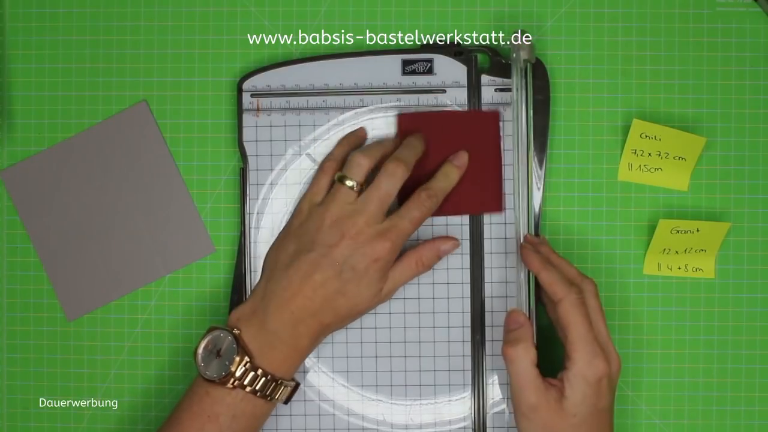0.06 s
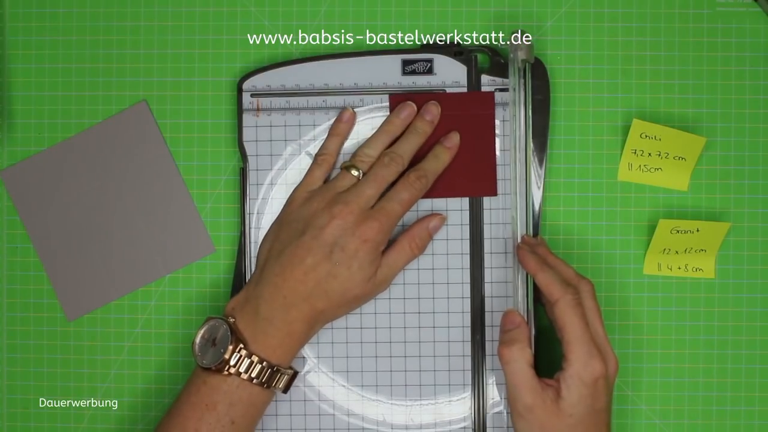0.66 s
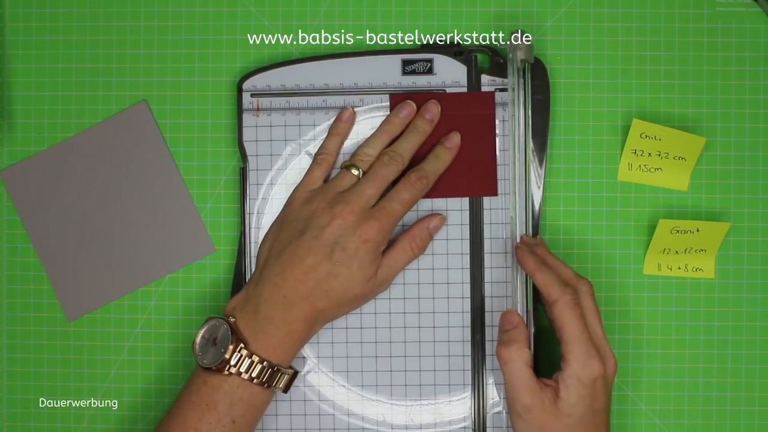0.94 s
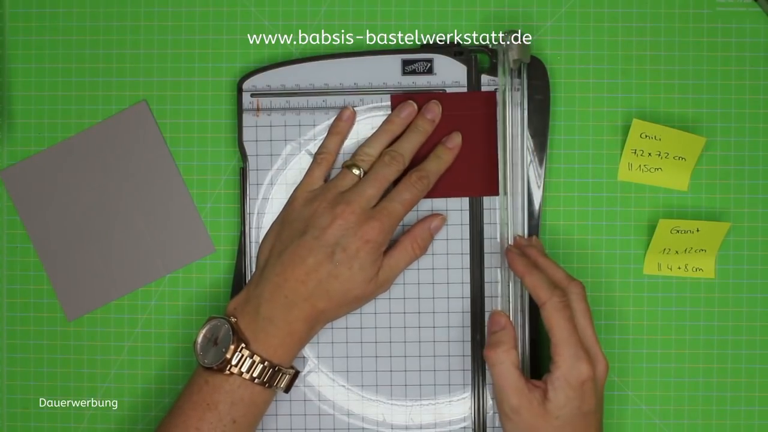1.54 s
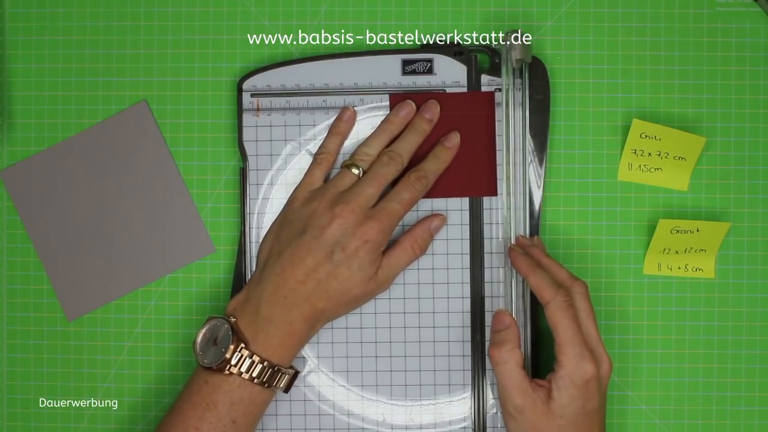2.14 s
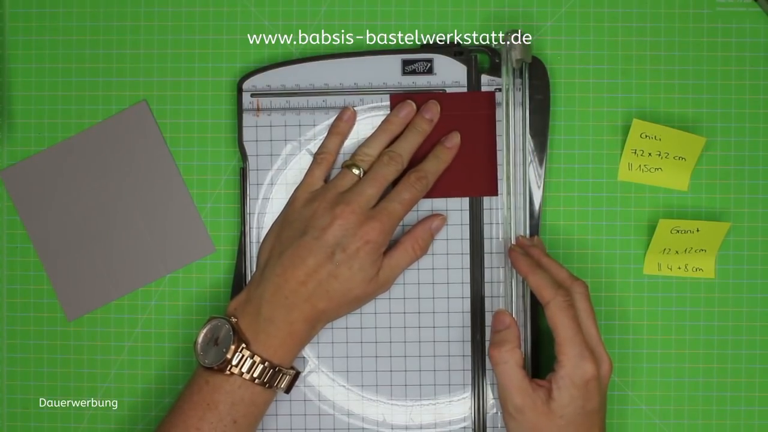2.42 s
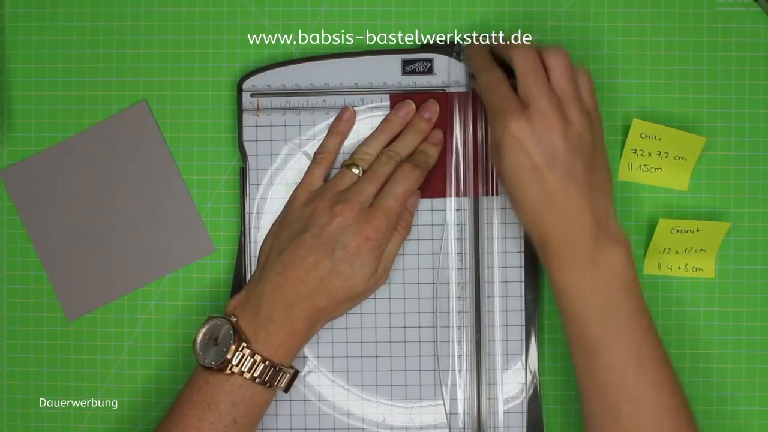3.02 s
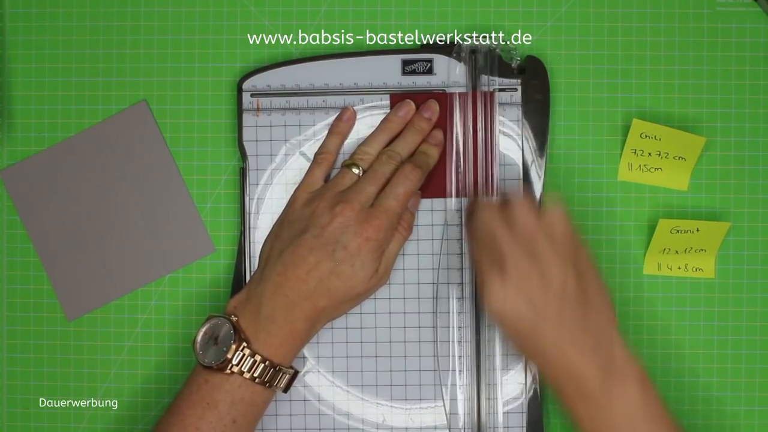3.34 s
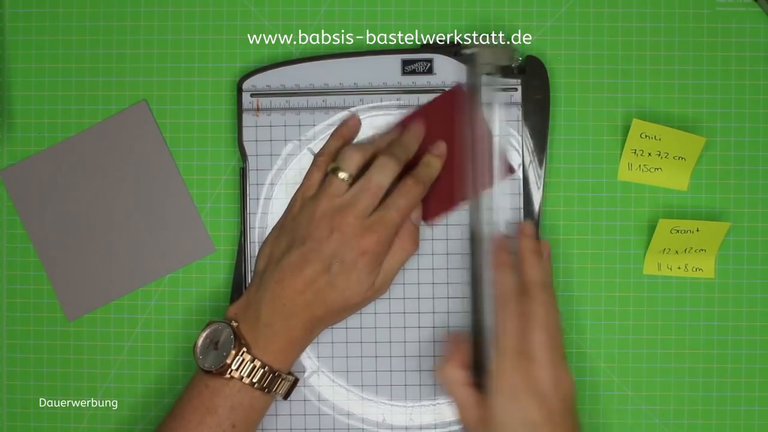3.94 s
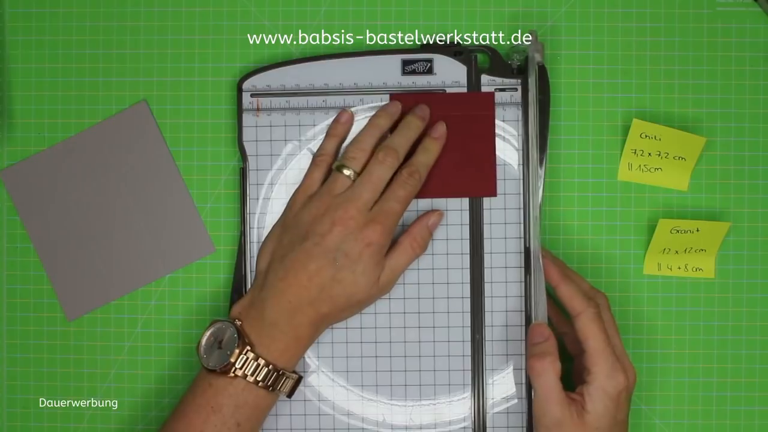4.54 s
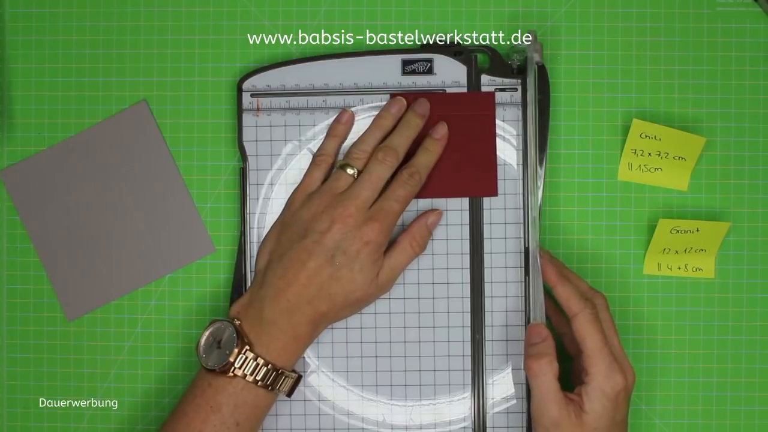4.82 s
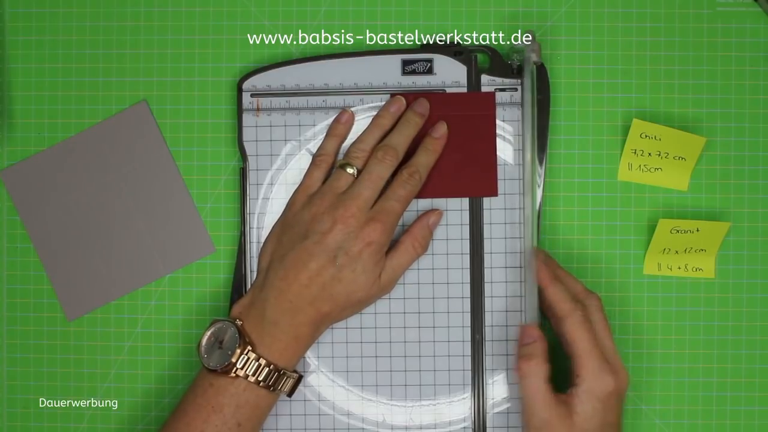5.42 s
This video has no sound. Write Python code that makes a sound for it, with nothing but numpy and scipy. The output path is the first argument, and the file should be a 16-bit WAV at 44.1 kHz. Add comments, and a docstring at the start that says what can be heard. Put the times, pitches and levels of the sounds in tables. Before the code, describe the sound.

A paper trimmer is handled nearby in a small, quiet room with a faint steady hum and hiss. In the first half second, card rubs softly over the trimmer bed with a few light finger taps. Faint ticks follow around 1.3 to 1.9 seconds. At 2.7 seconds the plastic rail snaps down with a short ring. From 3 seconds the slider clicks loosely, then scrapes along the rail and back until about 3.8 seconds, chattering, rasping and briefly groaning while the scoring blade hisses over the card. This is loudest around 3.5 seconds. The rail lifts with small clicks near 3.9 seconds, and the card is turned and lined up with dull rubs and soft taps until about 4.6 seconds. After a quiet pause, a few light clicks lead to the rail snapping down again at 5.6 seconds.

```python
"""A paper trimmer on a craft table in a small, quiet room with a faint mains hum.
Fingers tap and nudge a card into place, rubbing it over the bed. At 2.7 s the clear rail snaps down
and its plastic modes ring. From 3 s the slider clicks in its play and runs up the rail and back:
stick-slip makes it chatter, rasp and groan while the scoring blade hisses over the card's fibres.
At 3.9 s the rail is lifted, the card is turned and lined up, and at 5.6 s the rail snaps down again."""
import sys
import numpy as np
from scipy import signal
from scipy.fft import rfft, irfft
from scipy.io import wavfile

SR = 44100
rng = np.random.default_rng(int(sys.argv[2]) if len(sys.argv) > 2 else 0)


def wrap_up_sound(samples):
    """Save the sound to the file named by the first command line argument, as 16-bit audio."""
    columns = np.atleast_2d(samples).T
    # keep every value between -1 and 1, then stretch to whole-number steps
    tamed = np.clip(columns, -1, 1)
    steps = np.round(tamed * 32767).astype(np.int16)
    wavfile.write(sys.argv[1], SR, steps)


N = 250047
TIME = np.arange(N) / SR
RING_TIME = TIME[:SR // 3]


def amp(db):
    """Decibels to gain."""
    return 10 ** (np.asarray(db) / 20)


def unit(x):
    """Scale to rms 1."""
    return x / np.sqrt(np.mean(x ** 2) + 1e-20)


def lookup(points, hz):
    """Interpolate on a log-frequency axis."""
    f, value = np.transpose(points)
    return np.interp(np.log(hz + 1), np.log(f + 1), value)


def colour(x, spectrum):
    """Zero-phase filter from (f/Hz, gain/dB) points."""
    hz = np.fft.rfftfreq(len(x), 1 / SR)
    return irfft(rfft(x) * amp(lookup(spectrum, hz)), len(x))


def causal_pulse(spectrum):
    """Minimum-phase pulse from (f/Hz, gain/dB) points."""
    hz = abs(np.fft.fftfreq(2048, 1 / SR))
    log_gain = np.log(amp(lookup(spectrum, hz)))
    return np.fft.ifft(np.exp(np.conj(signal.hilbert(log_gain)))).real[:1024]


def band(x, lo_hz, hi_hz):
    """Causal band-pass."""
    return signal.sosfilt(signal.butter(3, [lo_hz, hi_hz], "band", fs=SR, output="sos"), x)


def lowpass(x, hz, order=2):
    """Causal low-pass."""
    return signal.sosfilt(signal.butter(order, hz, fs=SR, output="sos"), x)


def add(mix, start_s, sound):
    """Mix in place from start_s."""
    part = mix[round(start_s * SR):][:len(sound)]
    part += sound[:len(part)]


def swell(t, length_s, rise_share=0.49, ends_db=-37):
    """Bell-shaped gain, peak at t = 0."""
    away = t / (length_s * np.where(t < 0, rise_share, 1 - rise_share))
    return amp(ends_db * np.minimum(away ** 2, 10))


def ring(modes):
    """One decaying sine per mode, alternating in sign."""
    hz, db, t60_s = np.transpose(modes)[:, :, None]
    sign = (-1) ** np.arange(len(modes))[:, None]
    return sign * amp(db - 60 * RING_TIME / t60_s) * np.sin(2 * np.pi * hz * RING_TIME)


def friction(slips_per_s, spread_db, smooth, clump_db, clump_hz):
    """Tiny uneven slips over a smooth rub, clumping as the surface varies."""
    sizes = rng.standard_normal(N) * amp(spread_db * np.minimum(rng.exponential(1, N), 4))
    slips = sizes * (rng.random(N) < slips_per_s / SR)
    clumps = unit(lowpass(rng.standard_normal(N), clump_hz))
    rub = smooth * rng.standard_normal(N)
    return unit((unit(slips) + rub) * amp(clump_db * clumps))


# still-room spectrum: f/Hz, gain/dB
ROOM_SPECTRUM = [(12, -16), (20, -1.5), (49, -9.5), (61, -7.5), (77, -19.5), (138, -15.5), (216, -19.5),
                 (285, -18.5), (357, -21.5), (527, -24.5), (607, -25), (698, -28), (1530, -30),
                 (11400, -31.5), (16000, -35)]


def background(air_db=-62, hum_db=-64, mains_hz=50):
    """Steady hiss and rumble with a wavering mains hum."""
    waver = unit(colour(rng.standard_normal(N), [(1, 16), (4, -4), (12, -36), (40, -100)]))
    hum = np.sqrt(2) * (1 + 0.34 * waver) * np.sin(2 * np.pi * mains_hz * TIME)
    air = colour(rng.standard_normal(N), ROOM_SPECTRUM)
    air /= np.std(band(air, 85, 18000))
    return amp(air_db) * air + amp(hum_db) * hum


# room decay: f/Hz, t60/s
ROOM_T60 = [(100, 1), (400, 0.56), (2000, 0.33), (6000, 0.27), (15000, 0.49)]
# desk, shelf and wall reflections: delay/s, level/dB
REFLECTIONS = [(.0068, -26), (0.009, -28.5), (0.025, -28), (.029, -26.5), (.058, -19)]


def room(x, tail_db, build_s):
    """Direct sound, early reflections and a diffuse tail; the bass lasts longest."""
    hz, t, bins = signal.stft(rng.standard_normal(SR // 2), SR, nperseg=256)
    decay = 1e-3 ** (t / lookup(ROOM_T60, hz)[:, None])
    response = signal.istft(bins * decay, SR, nperseg=256)[1]
    response *= np.minimum(TIME[:len(response)] / build_s, 1) ** 2
    response *= amp(tail_db) / np.linalg.norm(response)
    for delay_s, db in REFLECTIONS:
        add(response, delay_s, amp([db]))
    absorbed = lowpass(response, 7000, order=1)
    return x + signal.oaconvolve(x, absorbed)[:N]


# modes of the trimmer bed and table: f/Hz, level/dB, t60/s
BED_MODES = [(127.3, 2, 0.053), (130.8, -14.5, 0.41), (293, -7, 0.092), (408, -8.5, 0.094),
             (516, 1.5, 0.024), (569.4, 2, 0.076), (690, 0, 0.05), (779.5, 2, 0.06), (1070, -58, 0.04),
             (1115, -3.5, 0.095), (1200, -19, 0.045), (1520, 5.5, 0.035), (1860, 5.5, 0.039),
             (2000, 4, 0.042), (2590, -7, 0.033), (2497, -6.5, 0.057), (2760, -4, 0.062), (6140, -32, .015)]


def through_bed(x, ring_db):
    """Friction heard directly and through the bed's modes."""
    ringing = signal.oaconvolve(x, ring(BED_MODES).sum(0))[:N]
    return unit(x + amp(ring_db) * unit(ringing))


# sliding-card spectra: f/Hz, gain/dB
CARD_RUB_SPECTRUM = [(80, 1), (150, 4.5), (300, -8.5), (500, 10), (800, 2), (1300, -5.5), (2600, -8.5),
                     (4000, -19.5), (7000, -27)]
CARD_HISS_SPECTRUM = [(1500, 7.5), (3000, 1), (5000, -0.5), (6800, 8.5), (9000, 0), (13000, 8), (16000, -7)]
# card shoves: peak t/s, length/s, rub level/dB, hiss level/dB
CARD_SHOVES = [(0.01, 0.06, -54.5, -70), (0.064, 0.29, -59.5, -64), (0.175, 0.056, -45.5, -69),
               (0.215, 0.34, -70, -60), (1.415, 0.13, -63.5, -84), (2.612, 0.061, -58, -46.5),
               (3.938, 0.29, -59, -54.5), (3.999, 0.08, -40.5, -56), (4.043, 0.079, -40.5, -62),
               (4.058, 0.035, -57, -46.5), (4.091, 0.044, -44, -66), (4.139, 0.18, -59, -67),
               (4.242, 0.19, -67, -60), (4.304, 0.062, -44.5, -65), (4.39, 0.18, -81, -60)]


def card():
    """Card dragged by fingertips: dull rub in the bed, fine hiss of fibres."""
    slips = friction(slips_per_s=1800, spread_db=2, smooth=1, clump_db=0.5, clump_hz=90)
    rub = unit(colour(through_bed(slips, ring_db=-16.5), CARD_RUB_SPECTRUM))
    hiss = unit(colour(slips, CARD_HISS_SPECTRUM))
    return sum(swell(TIME - peak_s, length_s) * (amp(rub_db) * rub + amp(hiss_db) * hiss)
               for peak_s, length_s, rub_db, hiss_db in CARD_SHOVES)


def groan(t, hz, width_hz):
    """Rough friction driving one narrow resonance."""
    flutter = lowpass(rng.standard_normal((2, len(t))), width_hz / 2)
    swing = flutter[0] + 1j * flutter[1]
    swing /= np.sqrt(abs(swing) + 1e-9)  # grip limits the swing
    return unit((swing * np.exp(2j * np.pi * hz * t)).real)


# stick-slip groans and squeaks: peak t/s, length/s, f/Hz, level/dB
STICK_SLIPS = [(0.181, 0.047, 801.5, -48.5), (3.313, 0.064, 700, -33.5), (3.347, 0.067, 399, -38.5),
               (3.459, 0.028, 408, -24), (3.521, 0.047, 396, -27.5), (3.557, 0.074, 650, -30.5),
               (3.621, 0.057, 413, -30), (3.919, 0.014, 2746, -32.5), (3.994, .08, 425, -39.5),
               (4.047, 0.062, 785, -40)]


def groans():
    """Slider, rail or card catches; one resonance swells and dies."""
    out, t = np.zeros(N + SR), TIME[:SR // 4]
    middle_s = t[-1] / 2
    for peak_s, length_s, hz, db in STICK_SLIPS:
        gain = amp(db) * swell(t - middle_s, length_s)
        add(out, peak_s - middle_s, gain * groan(t, hz, width_hz=84))
    return out[:N]


# edges of the four blow bands (table thud, bed knock, plastic clack, edge tick): f/Hz
BLOW_EDGES_HZ = [85, 250, 1200, 4000, 18000]
# share of hardness per band: thud, knock, clack, tick
BAND_HARDNESS = [0, 0, .5, 1]


def blows(rows, modes, spectrum, balance_db, spot_db, click_db, crack_db, crack_t60_s,
          buzz_db, buzz_t60_s, favour_db, favour_octaves):
    """Click, crack, dense plastic buzz and clear modes; hard contact lifts the treble."""
    out, t = np.zeros(N), RING_TIME
    tones, mode_hz = ring(modes), np.transpose(modes)[0]
    pulse = causal_pulse(spectrum)
    fade = amp(crack_db - 60 * t / crack_t60_s) + amp(buzz_db - 60 * t / buzz_t60_s)
    attack = round(0.012 * SR)
    centre_hz = np.sqrt(np.multiply(BLOW_EDGES_HZ[:-1], BLOW_EDGES_HZ[1:]))
    for start_s, spot_hz, level_db, hardness_db in rows:
        contact = fade * rng.standard_normal(len(t)) + amp(click_db) * (t == 0)
        # the struck spot favours modes and bands near spot_hz
        mode_gain = amp(favour_db * np.exp(-(np.log2(mode_hz / spot_hz) / favour_octaves) ** 2))
        lift_db = spot_db * np.exp(-np.log2(centre_hz / spot_hz) ** 2)
        blow = signal.fftconvolve(contact, pulse)[:len(t)] + mode_gain @ tones
        bands_db = level_db + np.array(balance_db) + hardness_db * np.array(BAND_HARDNESS) + lift_db
        for db, lo_hz, hi_hz in zip(bands_db, BLOW_EDGES_HZ, BLOW_EDGES_HZ[1:]):
            part = band(blow, lo_hz, hi_hz)
            add(out, start_s, amp(db) * part / np.std(part[:attack]))
    return out


# contact spectrum: f/Hz, gain/dB
KNOCK_SPECTRUM = [(50, -10), (130, -4), (400, 4), (800, -3), (2500, 0), (3600, -6.5), (4700, -4.5),
                  (6300, 3.5), (9000, -5.5), (13000, -6), (16000, -17)]
# blows: t/s, spot f/Hz, level/dB, hardness/dB
BED_TAPS = [(0.1685, 1115, -58.5, 2), (0.2895, 770, -54, 1), (0.3232, 690, -54, 6), (0.409, 753, -52, -4),
            (0.4876, 702, -43.5, 4.5), (1.3156, 408, -58.5, -10), (1.3541, 1530, -54.5, 4.5),
            (1.914, 700, -54, -11), (4.274, 120, -43.5, 17.5), (4.2895, 120, -52, 0),
            (4.4544, 275, -53, -3), (4.4838, 690, -63, 19), (4.4981, 297, -52, 8.5), (4.6385, 746, -59, 10)]
PLASTIC_CLICKS = [(1.5014, 1270, -50.5, -10.5), (2.5349, 2130, -61, -9), (2.5858, 1830, -52.5, -16),
                  (2.9915, 1700, -58.5, -12), (3.0319, 1860, -35.5, -4), (3.054, 480, -45, -4),
                  (3.0845, 1950, -44, -1), (3.0965, 1990, -54, 7), (3.1285, 1930, -55, -3),
                  (3.1542, 1560, -47, -5), (3.3505, 690, -37.5, 10), (3.4472, 786, -41.5, 16.5),
                  (3.4522, 785, -29, 8), (3.456, 1860, -42, 7), (3.5179, 388, -37.5, 10.5),
                  (3.6175, 400, -41.5, -8), (3.6632, 445, -46.5, -18), (3.7022, 1870, -39.5, -10),
                  (3.7218, 1130, -43.5, -8), (3.8205, 724, -45.5, -20), (3.8339, 1226, -34, 1),
                  (3.889, 650, -44, 2), (3.9145, 2750, -47.5, 10), (4.053, 786, -47, 8),
                  (4.1205, 784, -41.5, 1.5), (4.2434, 1770, -56.5, 0), (5.471, 1940, -60.5, -6),
                  (5.4851, 1960, -45.5, -12), (5.5362, 2380, -56, -6)]
# band balance: thud/dB, knock/dB, clack/dB, tick/dB
TAP_BANDS_DB = [1.5, 1.5, -7.5, -24]
CLICK_BANDS_DB = [-9.5, 1.5, 1.5, -10.5]


def knocks():
    """Fingers and card bump the bed; slider and rail knock in their play."""
    return sum(blows(rows, BED_MODES, KNOCK_SPECTRUM, balance_db, spot_db=4.5, click_db=33,
                     crack_db=14.5, crack_t60_s=0.015, buzz_db=14, buzz_t60_s=0.067,
                     favour_db=8.5, favour_octaves=0.14)
               for rows, balance_db in [(BED_TAPS, TAP_BANDS_DB), (PLASTIC_CLICKS, CLICK_BANDS_DB)])


# rail modes: f/Hz, level/dB, t60/s
RAIL_MODES = [(498, -5.5, 0.12), (579.6, -6.5, 0.18), (1110, -26, 0.018), (1462, -12, 0.12),
              (1546, -0.5, 0.022), (1656, 2.5, 0.042), (1996, -6, 0.041), (2107, 0.5, 0.033),
              (2640, -4, 0.08), (2840, -21, 0.041), (3097, -0.5, 0.041), (3350, -10, .03), (4070, -31, .03),
              (6300, -37, 0.051), (8000, -17, 0.023)]
# contact spectrum: f/Hz, gain/dB
SNAP_SPECTRUM = [(50, -6.5), (170, -4), (260, -8.5), (400, 2), (500, -2), (850, 1), (1700, -5), (3500, -1),
                 (4800, -5), (6300, 4), (8000, -1), (11000, -5), (13000, -10), (16000, -22)]
# band balance: thud/dB, knock/dB, clack/dB, tick/dB
SNAP_BANDS_DB = [-12, 1, 9.5, 3.5]
# rail down, up, down: t/s, spot f/Hz, level/dB, hardness/dB
RAIL_SNAPS = [(2.7028, 1546, -35, -2.5), (3.9001, 6760, -56.5, 19.5), (5.6121, 534, -34, 1.5)]


def rail_snaps():
    """The rail snaps into or out of its catch and rings."""
    return blows(RAIL_SNAPS, RAIL_MODES, SNAP_SPECTRUM, SNAP_BANDS_DB, spot_db=1.7, click_db=31.5,
                 crack_db=19.5, crack_t60_s=0.0032, buzz_db=12, buzz_t60_s=0.053,
                 favour_db=4.5, favour_octaves=0.062)


# slider moves: t/s, rise/s, hold/s, fall/s, rub level/dB, blade level/dB
SLIDER_MOVES = [(3.6, 0.021, .06, 0.027, -54, -57), (3.15, .1, .125, .075, -38, -44.5),
                (3.405, 0.017, 0.035, 0.016, -46.5, -81), (3.435, 0.02, 0.14, 0.067, -33, -43.5),
                (3.69, 0.016, .02, 0.028, -42, -75), (3.64, 0.038, 0.15, 0.077, -65, -82)]
# blade digging in at the card's edges: peak t/s, length/s, rub level/dB, blade level/dB
EDGE_BITES = [(3.243, 0.054, -39.5, -76), (3.367, 0.11, -39.5, -46.5)]


def stroke_gains(chatter_start_db=-4.5, build_db_per_s=27):
    """Friction follows hand speed and swells at each bite; chatter builds during a move."""
    chatter, rasp, hiss = np.zeros((3, N))
    for start_s, rise_s, hold_s, fall_s, rub_db, blade_db in SLIDER_MOVES:
        t = TIME - start_s
        ramp = np.minimum(t / rise_s, (rise_s + hold_s + fall_s - t) / fall_s)
        speed = np.sin(np.pi / 2 * np.clip(ramp, 0, 1)) ** 2
        build_db = chatter_start_db + build_db_per_s * np.clip(t, 0, rise_s + hold_s)
        chatter += amp(rub_db + build_db) * speed ** 2.7
        rasp += amp(rub_db) * speed
        hiss += amp(blade_db) * speed ** 0.91
    for peak_s, length_s, rub_db, blade_db in EDGE_BITES:
        bite = swell(TIME - peak_s, length_s)
        chatter += amp(rub_db + chatter_start_db) * bite
        rasp += amp(rub_db) * bite
        hiss += amp(blade_db) * bite
    return chatter, rasp, hiss


# slider-on-rail spectrum: f/Hz, gain/dB
SLIDER_SPECTRUM = [(60, -32), (120, -5), (220, -2.5), (400, 0), (600, -1.5), (850, -0.5), (1200, -1.5),
                   (1550, -1), (2600, -6.5), (3400, -12), (4700, -24)]


def slider(chatter_gain, rasp_gain):
    """The slider chatters, rasps and resonates in the rail; the table rumbles below."""
    slips = friction(slips_per_s=2500, spread_db=-4, smooth=0.99, clump_db=2.5, clump_hz=110)
    scrape = colour(through_bed(slips, ring_db=-17), SLIDER_SPECTRUM)
    chatter = unit(band(scrape, 110, 1510))
    rasp = unit(band(scrape, 1253, 4100))
    resonance = amp(-8.5) * groan(TIME, hz=412, width_hz=80)
    rumble = amp(-17.5) * unit(band(slips, 57, 186))
    return chatter_gain * (chatter + resonance + rumble) + rasp_gain * rasp


# blade-on-card spectrum: f/Hz, gain/dB
BLADE_SPECTRUM = [(2500, -24), (3900, 4.5), (4700, -2.5), (6000, 4), (7200, 4), (8800, -1.5), (10500, 0),
                  (13500, 0.5), (16000, -6)]


def blade(gain):
    """The blade hisses over the card's fibres; a fine fizz grows faster than the hiss."""
    fibres = friction(slips_per_s=7800, spread_db=5, smooth=5.4, clump_db=1.5, clump_hz=120)
    hiss = unit(colour(fibres, BLADE_SPECTRUM))
    grit = friction(slips_per_s=3000, spread_db=7, smooth=0.8, clump_db=2, clump_hz=100)
    fizz = amp(-5) * (gain / gain.max()) ** 0.65 * unit(band(grit, 9700, 17000))
    return gain * (hiss + fizz)


def scene():
    """Handling, scoring and rail snaps in the room, mono."""
    chatter_gain, rasp_gain, hiss_gain = stroke_gains()
    handling = knocks() + slider(chatter_gain, rasp_gain) + blade(hiss_gain) + card() + groans()
    handling = room(handling, tail_db=-14, build_s=0.017)
    snaps = room(rail_snaps(), tail_db=-9, build_s=0.019)
    return (handling + snaps + background())[None]


def record(dry):
    """Linear-phase band limit."""
    cutoff_hz = 16050
    kernel = signal.firwin(401, cutoff_hz, window=("kaiser", 8), fs=SR)
    return signal.oaconvolve(dry, kernel[None], "same")


dry = scene()
out = record(dry)
wrap_up_sound(out)
```